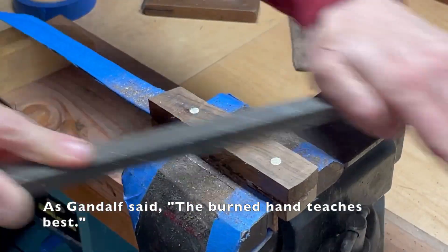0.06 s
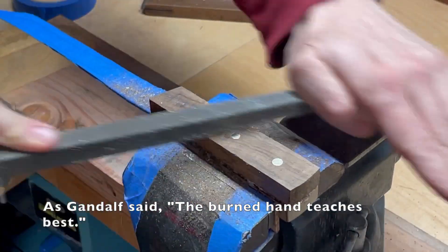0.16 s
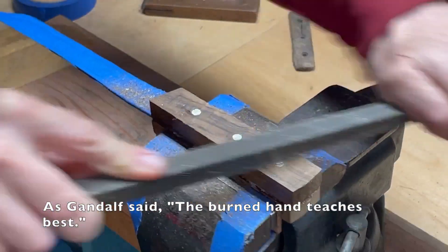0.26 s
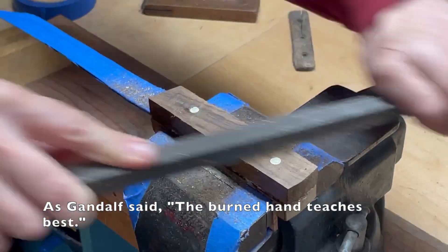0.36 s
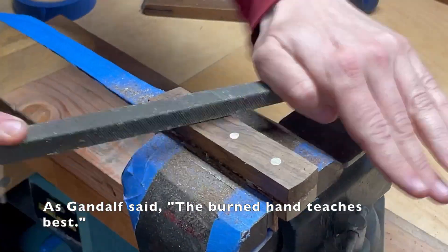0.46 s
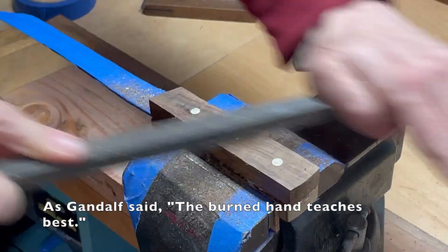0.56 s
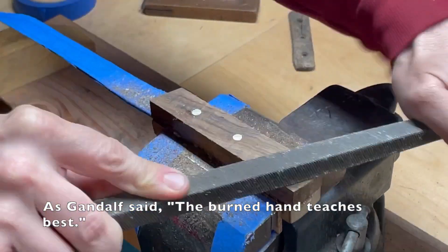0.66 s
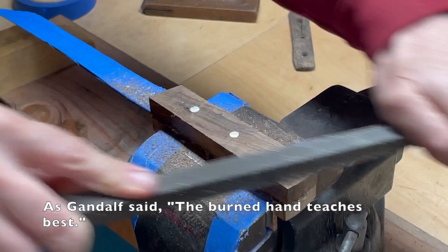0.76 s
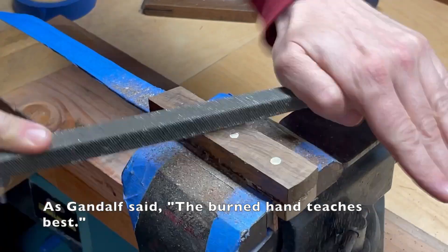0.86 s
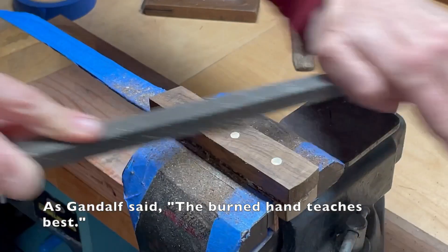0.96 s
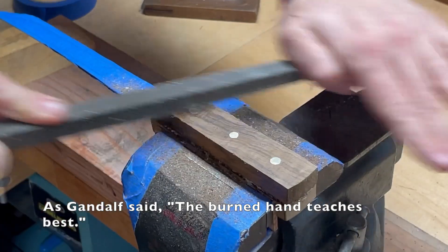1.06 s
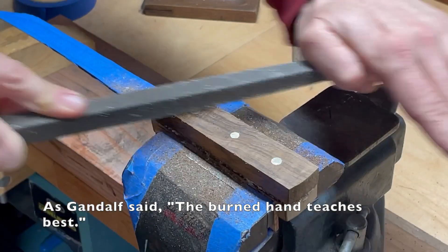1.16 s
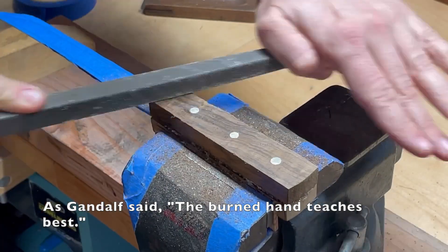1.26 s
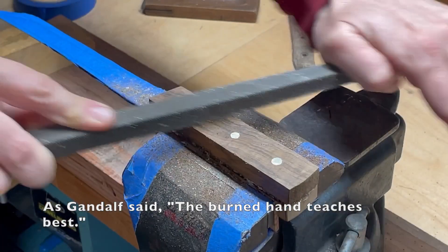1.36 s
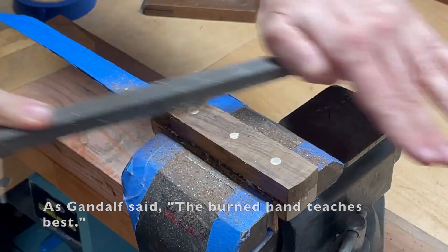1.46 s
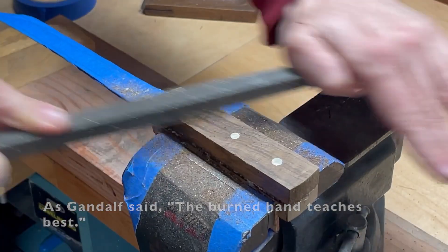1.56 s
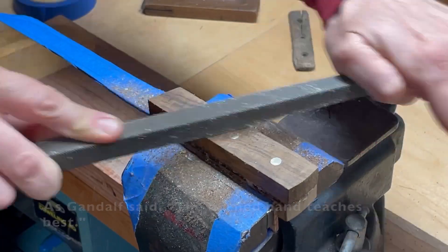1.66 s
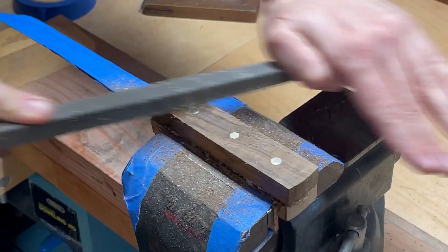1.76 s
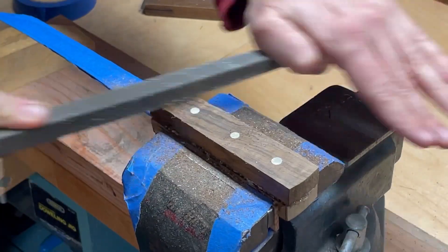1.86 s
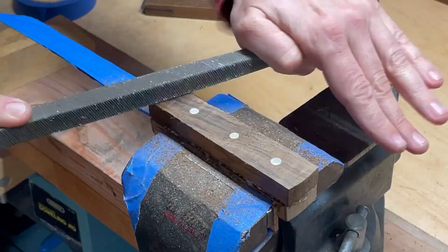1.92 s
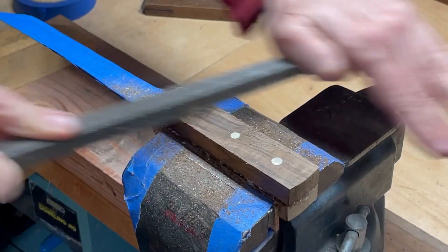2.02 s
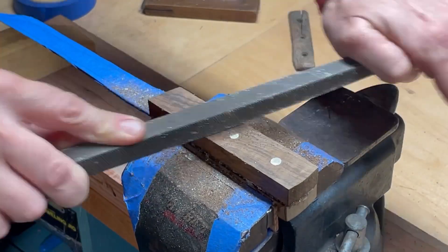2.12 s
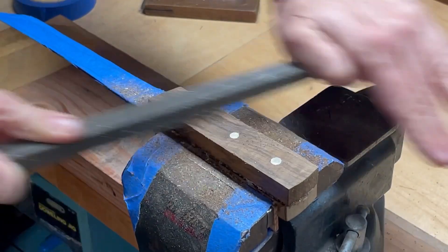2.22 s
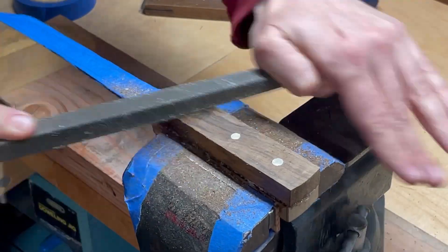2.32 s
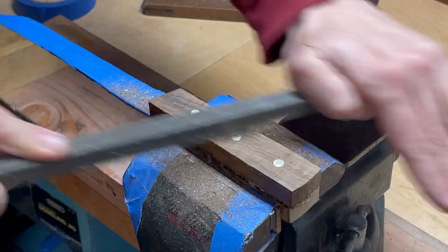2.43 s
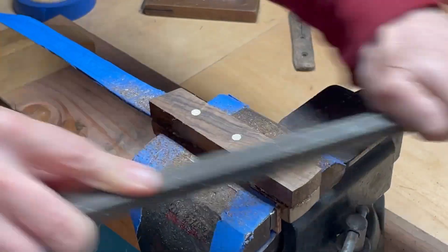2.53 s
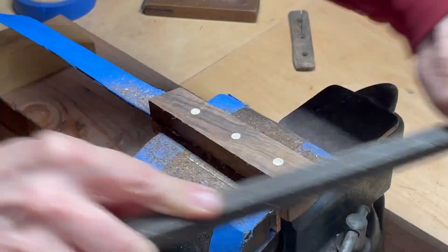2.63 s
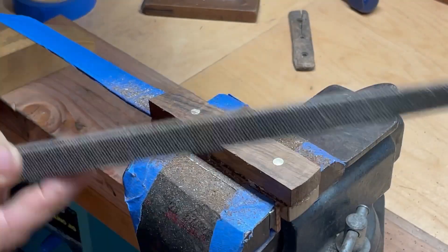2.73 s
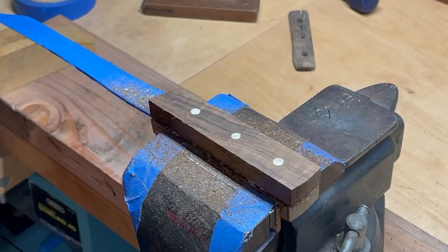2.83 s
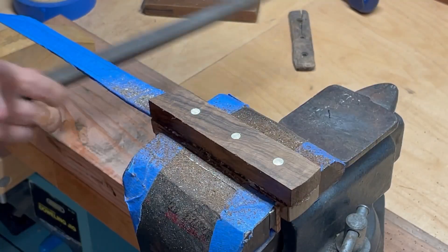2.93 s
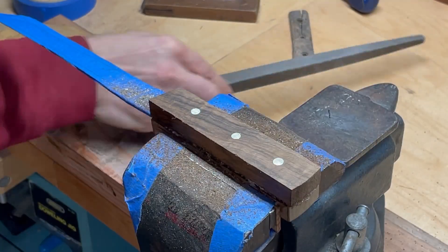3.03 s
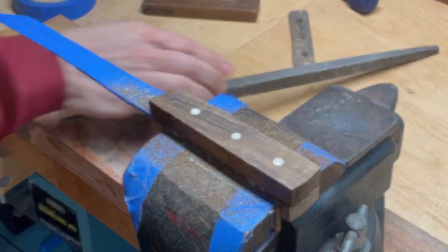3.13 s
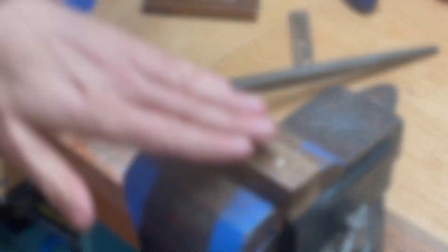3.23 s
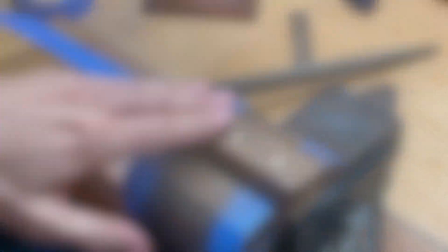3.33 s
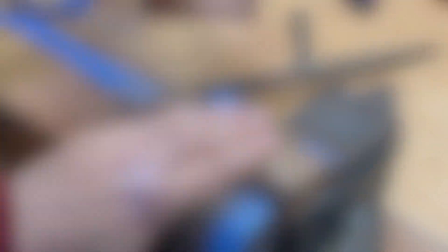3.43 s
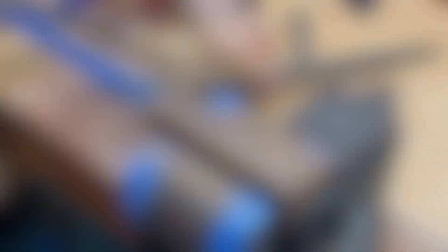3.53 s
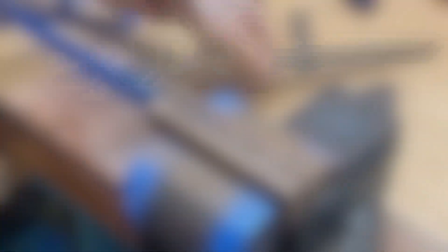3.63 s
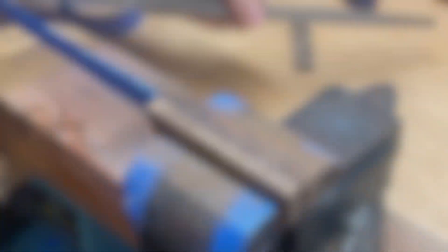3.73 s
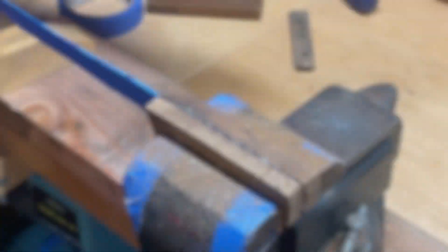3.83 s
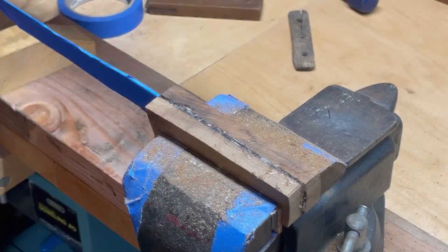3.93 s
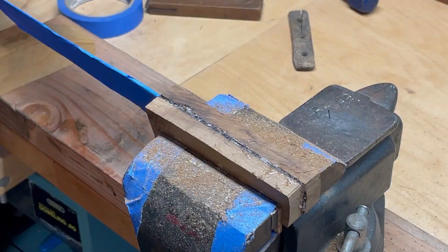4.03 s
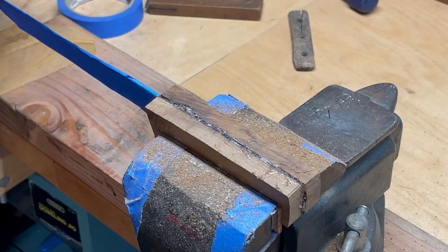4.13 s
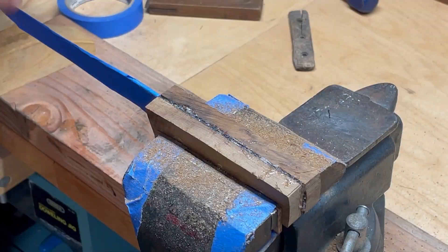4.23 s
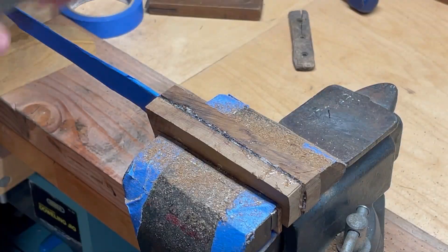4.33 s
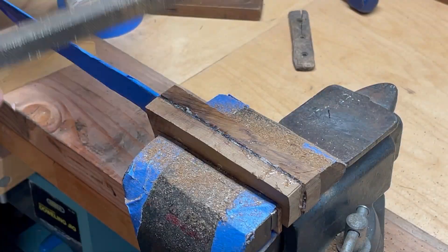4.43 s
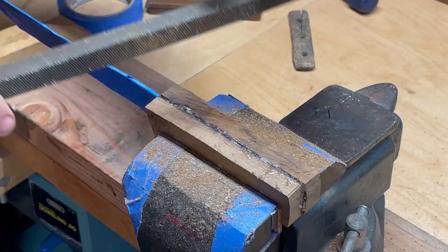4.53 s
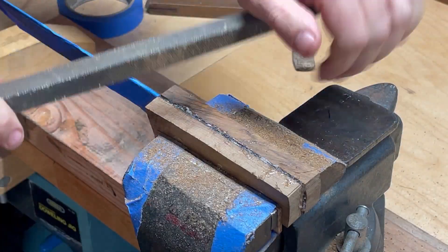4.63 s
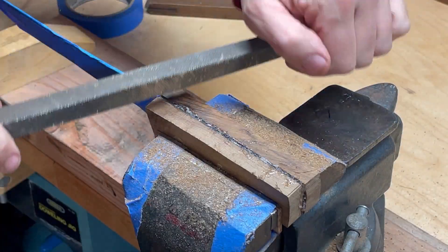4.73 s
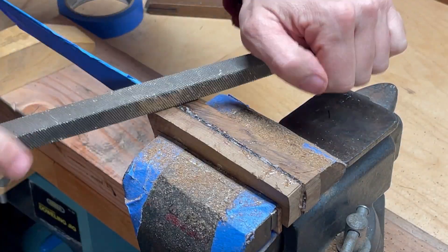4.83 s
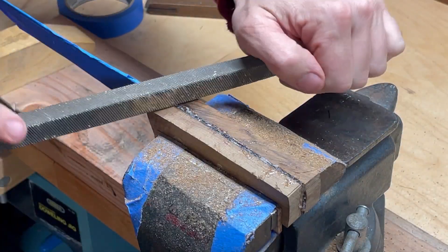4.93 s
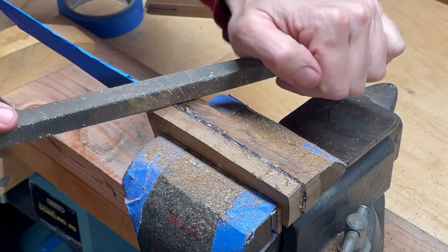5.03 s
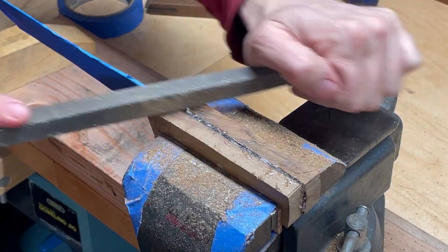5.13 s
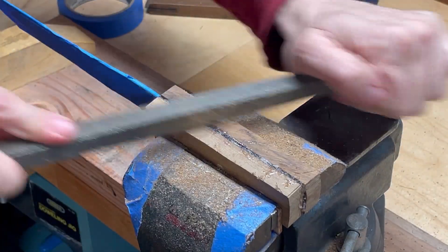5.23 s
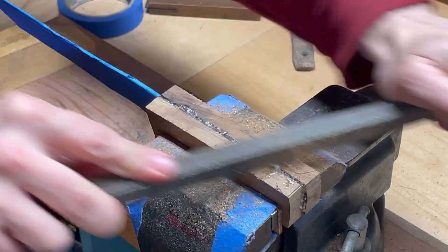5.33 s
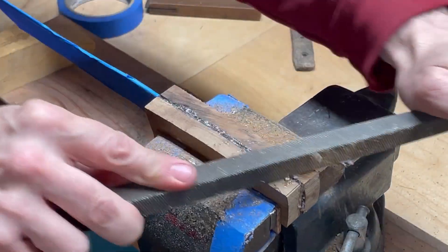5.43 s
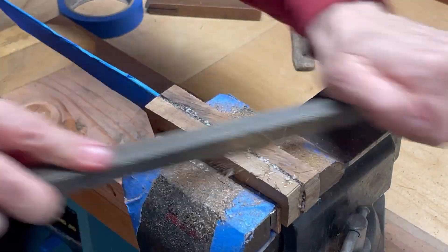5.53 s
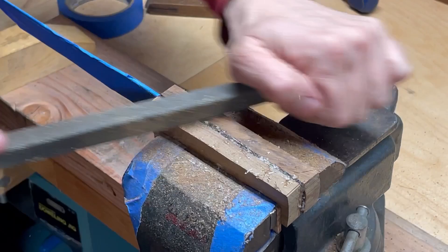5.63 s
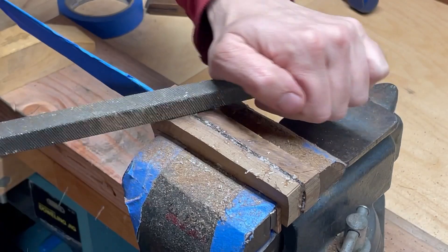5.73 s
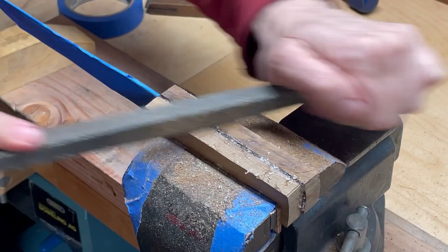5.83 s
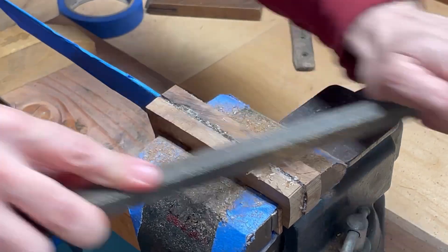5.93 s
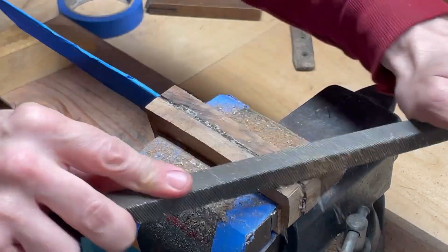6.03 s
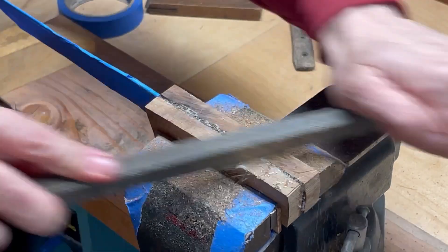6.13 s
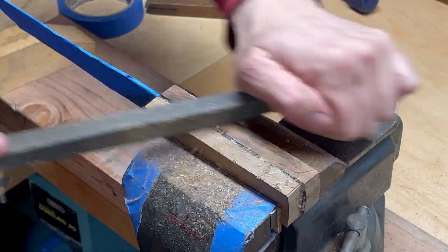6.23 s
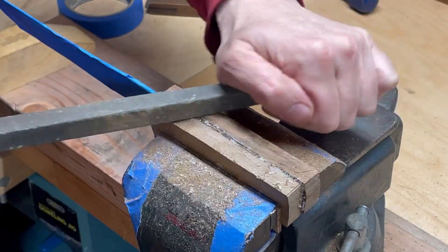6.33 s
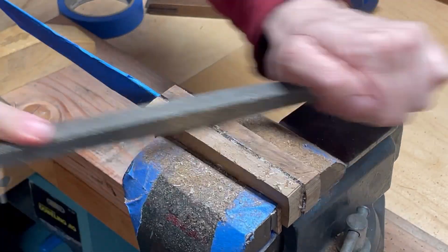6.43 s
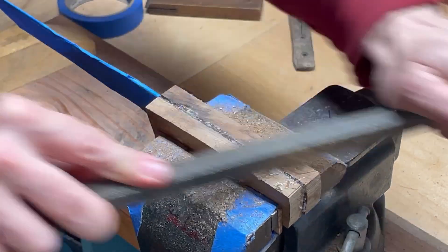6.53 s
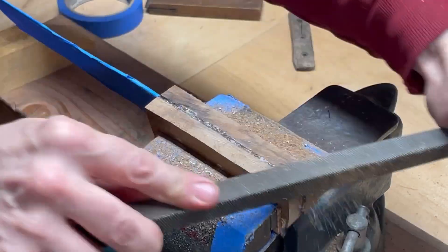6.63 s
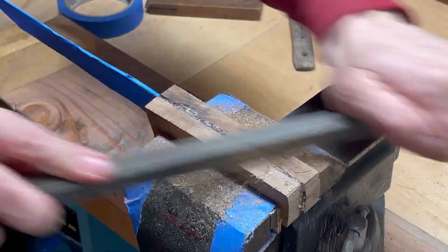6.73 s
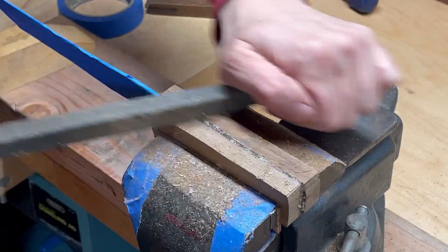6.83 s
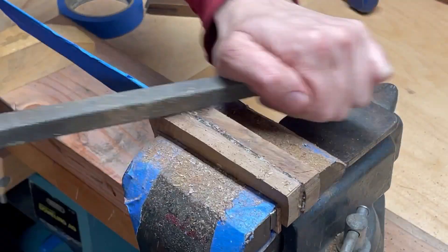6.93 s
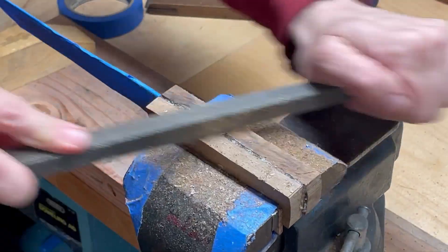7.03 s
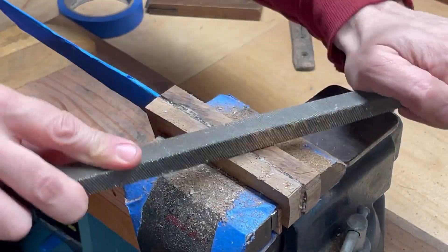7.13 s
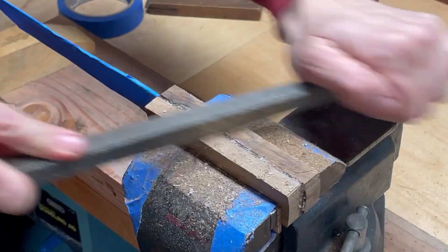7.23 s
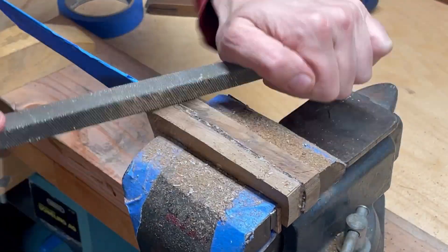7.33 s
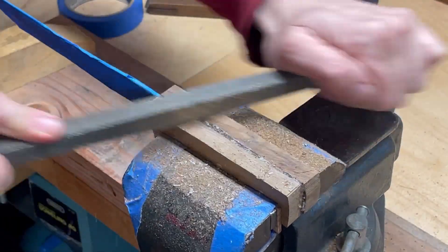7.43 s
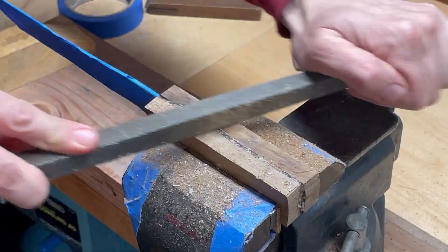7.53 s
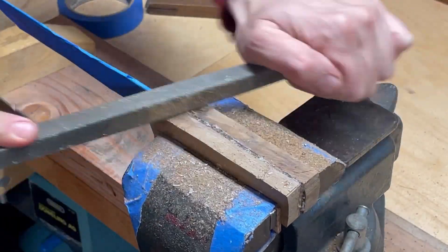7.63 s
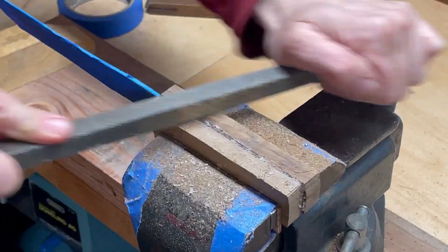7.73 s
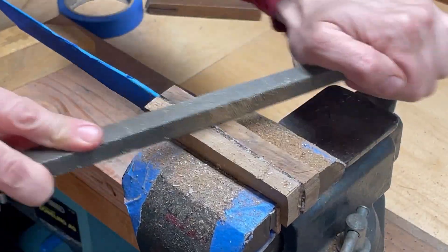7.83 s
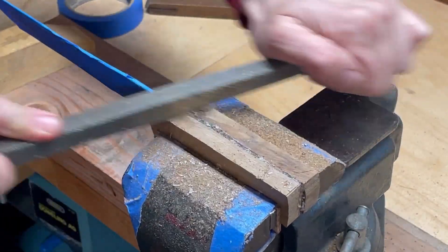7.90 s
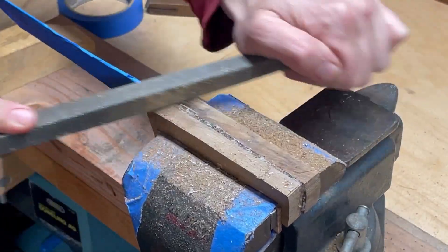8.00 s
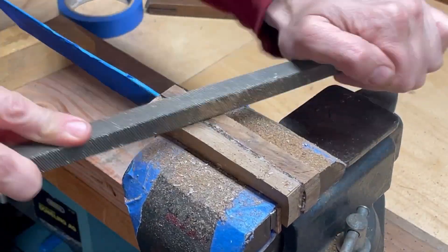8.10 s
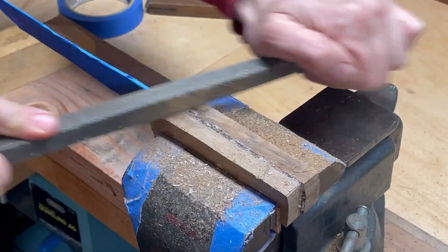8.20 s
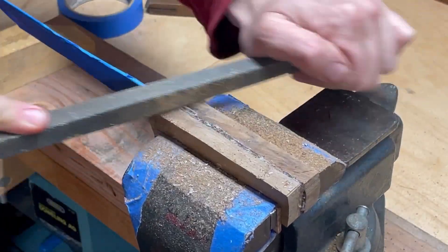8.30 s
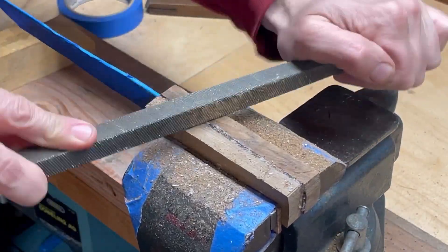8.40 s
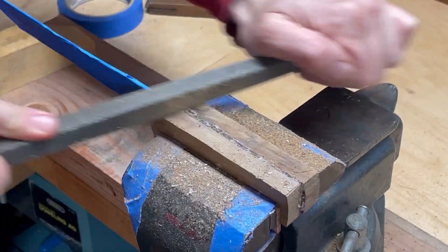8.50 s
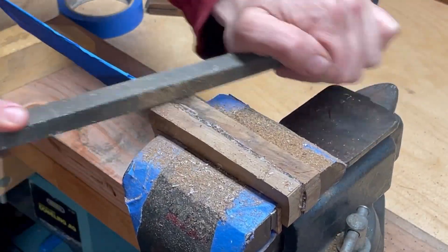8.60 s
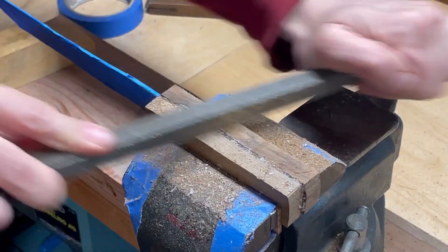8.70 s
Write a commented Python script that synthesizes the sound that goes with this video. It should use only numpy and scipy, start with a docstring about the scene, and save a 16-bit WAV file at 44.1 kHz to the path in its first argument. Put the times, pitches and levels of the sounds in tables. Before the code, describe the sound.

Sped-up file strokes rasp frantically on wood, then a sharp metallic-wooden clack, a soft dusty wipe, and slower coarse filing with vise groans.

```python
"""A flat file rasps wooden handle scales held in a bench vise, heard from close by over faint room tone.
First, quick strokes at four times speed: noise clicks in tooth rhythm, with jolting thuds and short rings.
Then the file drops on the bench in cracks with a wooden ring, and a hand wipes dust in gritty noise.
A sleeve of coloured noise rustles and brushes past, and the teeth scrape faintly as the file settles.
Last, filing at natural pace: biting pushes and lighter pulls, with short sinking tones as the vise groans."""
import sys
import numpy as np
from scipy import signal
from scipy.fft import rfft, irfft, next_fast_len
from scipy.io import wavfile
from scipy.ndimage import uniform_filter1d

SR = 44100
rng = np.random.default_rng(int(sys.argv[2]) if len(sys.argv) > 2 else 0)


def unload_wav(signal):
    """Save mono or channel-first audio to the path in sys.argv[1] as 16-bit WAV at rate SR, clipped to [-1, 1]."""
    wavfile.write(
        sys.argv[1],
        SR,
        np.round(np.clip(np.atleast_2d(signal).T, -1, 1) * 32767).astype(np.int16),
    )


N = 386306
LAPSE = 4  # times natural speed in the sped-up part
NATURAL_FROM_S = 3.5  # divides the sped-up part from the natural pace


def amp(db):
    """Decibels to gain."""
    return 10 ** (np.asarray(db) / 20)


def unit(x):
    """Scales to rms 1."""
    return x / np.sqrt(np.mean(x ** 2) + 1e-20)


def follow(rows, t):
    """The columns of a table at times t, fading fast beyond its ends."""
    s, *columns = np.transpose(rows)
    beyond = np.maximum(np.maximum(s[0] - t, t - s[-1]), 0)
    return [np.interp(t, s, column) - 700 * beyond for column in columns]


def colour(x, points, modes=()):
    """Filters by a smooth spectrum with resonances standing out of it; rms 1."""
    size = next_fast_len(len(x) + SR // 10)
    hz = np.fft.rfftfreq(size, 1 / SR)
    f, db = np.transpose(points)
    lift = 1 + sum(amp(2 * lift_db) / (1 + (2 * (hz - at) / width) ** 2) for at, width, lift_db in modes)
    gain = amp(np.interp(np.log(hz + 1), np.log(f), db)) * np.sqrt(lift)
    return unit(irfft(rfft(x, size) * gain, size)[:len(x)])


def wander(t, per_s):
    """Smooth chance of rms 1."""
    knots = np.arange(t[0], t[-1] + 1, 1 / per_s)
    return unit(np.interp(t, knots, rng.standard_normal(len(knots))))


def swell(t, rise_s, fall_s):
    """A rounded burst that peaks at time zero."""
    return np.exp(-(t / np.where(t < 0, rise_s, fall_s)) ** 2)


def throb(t, hz, rough, per_s=150):
    """An unsteady ring of rms 1."""
    angle = 2 * np.pi * np.cumsum(hz * np.ones(len(t))) / SR
    steady = np.cos(angle) * (1 + rough * wander(t, per_s) / 2)
    return unit(steady + rough * np.sin(angle) * wander(t, per_s))


# Spectrum of the room's rumble and hiss. Each row: frequency in Hz, density in dB per Hz.
ROOM_SPECTRUM = [(15, -44), (35, -9), (72, 0), (210, -19), (4000, -32), (15000, -52)]
ROOM_DB, RAISED_ROOM_DB = -66, -70


def room_tone(t):
    """Faint rumble and hiss of the workshop, raised in pitch until the natural pace sets in."""
    natural = np.clip((t - NATURAL_FROM_S) * 10, 0, 1)
    raised_spectrum = [(LAPSE * hz, db) for hz, db in ROOM_SPECTRUM]
    raised = colour(rng.standard_normal(N), raised_spectrum)
    plain = colour(rng.standard_normal(N), ROOM_SPECTRUM)
    return amp(RAISED_ROOM_DB) * (1 - natural) * raised + amp(ROOM_DB) * natural * plain


def fibres(t, per_s, spread_db):
    """Clicks of snapping wood fibres, a few far larger than the rest."""
    hit = rng.random(len(t)) < per_s / SR
    size_db = spread_db * np.minimum(rng.exponential(1, len(t)), 4)
    return hit * rng.choice([-1, 1], len(t)) * amp(size_db)


def drifting(x, patchy_db):
    """The ring of the work shifts as the point of contact travels: smooth random gains over time and pitch."""
    z = signal.stft(x, nperseg=1024)[2]
    patches = uniform_filter1d(rng.standard_normal(z.shape), size=3, axis=0)
    patches = uniform_filter1d(patches, size=9, axis=1)
    return unit(signal.istft(z * amp(patchy_db * unit(patches)))[1][:len(x)])


# Resonances of scales, tang and file before any speeding up. Each row: frequency in Hz, width in Hz,
# lift with the tip on the work in dB, lift with the heel on it in dB.
RESONANCES = [(564, 130, 4.5, 4.5), (685, 26, 11.5, 17), (1700, 195, 5.5, 4.5), (2392, 30, 3, 12),
              (2810, 350, -2.5, 7), (3430, 140, 7.5, -1)]


def rung(x, spectrum, travel):
    """The ring of file and work changes as the contact travels from the tip (0) to the heel (1)."""
    modes = np.array(RESONANCES)
    tip = colour(x, spectrum, modes[:, [0, 1, 2]])
    heel = colour(x, spectrum, modes[:, [0, 1, 3]])
    return drifting(tip + travel * (heel - tip), patchy_db=4.0)


# Spectra of the cutting hiss, the chattering work and the shuddering bench, before any speeding up.
# Each row: frequency in Hz, density in dB per Hz.
HISS_SPECTRUM = [(600, -15), (1500, -6.5), (2600, -5.5), (3900, -3.5), (4900, -10.5), (7800, -12),
                 (8600, -37), (10500, -16), (15500, -61)]
CHATTER_SPECTRUM = [(280, -4.5), (540, 5.5), (730, -7.5), (880, 3), (1400, -7), (2650, 3), (3400, -47)]
SHUDDER_SPECTRUM = [(22, -71), (53, 10.5), (76, 5.5), (160, 0), (240, -15), (500, -50.5)]


def filing(t, speed, travel, hiss_db, chatter_db, shudder_db, groan_db, edge_db):
    """Rows of teeth strike the wood at a rate set by the speed; the work rings and shakes vise and bench."""
    tooth_hz = (190 + 150 * speed) * (1 + .16 * wander(t, 110))
    turns = np.cumsum(tooth_hz) / SR
    teeth = amp(1.6 * np.cos(2 * np.pi * turns) + 1.76 * wander(t, 200))  # the bite varies with the grain
    cut = rung(teeth * fibres(t, 12000, 2.2), HISS_SPECTRUM, travel)
    cut = unit(cut + amp(edge_db) * np.diff(cut, prepend=0))  # a keen edge is brighter
    chatter = rung(teeth * fibres(t, 2500, 3.9), CHATTER_SPECTRUM, travel)
    shudder = colour(fibres(t, 500, 3.04), SHUDDER_SPECTRUM)
    tooth_note = np.sin(2 * np.pi * turns) * (0.35 + wander(t, 140))
    octave_below = 0.31 * np.sin(np.pi * turns) * wander(t, 160)
    groan = unit(tooth_note + octave_below)
    sound = amp(hiss_db) * cut + amp(chatter_db) * chatter
    sound = sound + amp(shudder_db) * shudder + amp(groan_db) * groan
    no_deep_bass = signal.butter(2, 34, "high", fs=SR, output="sos")  # the filing carries no deep bass
    return signal.sosfilt(no_deep_bass, sound)


# The sped-up strokes, a trip forth and back at a time. Each row: middle of the push in seconds,
# effort of the push in dB, effort of the pull in dB.
TRIPS = [(-.012, -34, -33.5), (.048, -34.5, -36.5), (0.136, -32.5, -34.5), (.205, -38, -35.5),
         (.281, -36.5, -34.5), (.362, -35.5, -36.5), (.445, -37.5, -35.5), (.52, -34, -34.5),
         (.598, -35, -36.5), (0.681, -36.5, -38), (0.754, -37, -41.5), (0.834, -40.5, -38),
         (.92, -40.5, -31), (.986, -37, -33.5), (1.056, -36, -34.5), (1.13, -35, -41), (1.249, -42, -45),
         (1.318, -36.5, -36), (1.383, -38, -36.5), (1.45, -34, -36), (1.522, -36.5, -34),
         (1.596, -36, -36.5), (1.671, -36, -35.5), (1.747, -33, -35), (1.825, -37, -38), (1.909, -35, -36),
         (1.986, -34.5, -33), (2.061, -35.5, -34), (2.138, -36.5, -35.5), (2.225, -35.5, -33.5),
         (2.299, -35.5, -36), (2.38, -36, -37.5), (2.461, -32.5, -42), (2.548, -37.5, -39.5)]
LAST_PUSH_S, LAST_PUSH_DB = 2.639, -40  # one more push
LIFT_OFF_S, LIFT_OFF_DROP_DB = 2.727, 33.5  # then the file leaves the wood
PULL_AT = .48  # share of the trip at which the pull is fastest
# hiss, chatter and shudder beside the effort, in dB
QUICK_PUSH, QUICK_PULL = (2.44, -3.5, -3.06), (2.5, -2.5, -6)


def quick_filing():
    """Short even strokes that start abruptly and stop at each turn; sped up, they sound two octaves higher."""
    t = np.arange(round((LAST_PUSH_S + .5) * LAPSE * SR)) / SR
    heard_s, trips = t / LAPSE, np.array(TRIPS)
    pushes = trips[:, 0]
    pulls = pushes + PULL_AT * np.diff(np.r_[pushes, LAST_PUSH_S])
    middles = np.r_[np.c_[pushes, pulls].ravel(), LAST_PUSH_S, LIFT_OFF_S]
    efforts = np.r_[trips[:, 1:].ravel(), LAST_PUSH_DB, LAST_PUSH_DB - LIFT_OFF_DROP_DB]
    angle = np.pi * np.interp(heard_s, middles, np.arange(len(middles)))
    slack = np.sin(angle - .3 * np.sin(angle) ** 2) ** 2  # 0 at full speed, 1 at a turn
    pull = np.sin(angle / 2) ** 2  # 0 in a push, 1 in a pull
    effort_db = follow(np.c_[middles, efforts], heard_s)[0]
    hiss_db, chatter_db, shudder_db = (effort_db + a + pull * (b - a) for a, b in zip(QUICK_PUSH, QUICK_PULL))
    # the heavy bench evens out the strokes
    shudder_db = shudder_db - .5 * (effort_db - np.median(efforts)) * (heard_s < LAST_PUSH_S)
    groan_db = (chatter_db + shudder_db) / 2 - 6.5 - 8 * slack
    sound = filing(t, 1 - slack, (1 + np.sin(angle)) / 2,
                   hiss_db - 11.4 * slack ** 0.58, chatter_db - 13 * slack, shudder_db - 3.3 * slack,
                   groan_db, edge_db=-32)
    return np.pad(signal.resample_poly(sound, 1, LAPSE), (0, N))[:N]


# at natural pace; the sped-up part plays it four times as fast and high
CATCH_HZ, CATCH_RISE_S, CATCH_FALL_S = 681.4, 0.024, 0.021
CATCH_UPPER_HZ, CATCH_UPPER_DB = 1596, -12  # a second, weaker ring


def catch(t):
    """The teeth fall into step with the scales, which ring up and die away."""
    ring = throb(t, CATCH_HZ, rough=1.1) + amp(CATCH_UPPER_DB) * throb(t, CATCH_UPPER_HZ, rough=2.5)
    return swell(t, CATCH_RISE_S, CATCH_FALL_S) * ring


# at natural pace, likewise
BUMP_HZ, BUMP_RISE_S, BUMP_FALL_S, BUMP_SAG_OCTAVES_PER_S = 128, 0.025, 0.043, 9


def bump(t):
    """The file jolts against the work and the whole bench gives a rough thud that sinks in pitch."""
    hz = BUMP_HZ * 2 ** (-BUMP_SAG_OCTAVES_PER_S * t)
    note = throb(t, hz, rough=1.4) + amp(-11.5) * throb(t, 2.7 * hz, rough=4.1)
    thud = swell(t, BUMP_RISE_S, BUMP_FALL_S) * note
    return signal.sosfilt(signal.butter(4, 58, "high", fs=SR, output="sos"), thud)


# Dull bumps of the file against the work, mostly as a push ends. Each row: peak in seconds, level in dB.
BUMP_TIMES = [(.048, -37.5), (0.145, -32), (.297, -33.5), (.375, -34.5), (.451, -33.5), (1.522, -34),
              (1.745, -38), (4.879, -47.5), (4.969, -44.5), (5.211, -33), (5.38, -26.5), (6.004, -37),
              (6.459, -38)]
# The teeth catch and the scales ring out briefly. Each row: peak in seconds, level in dB.
CATCH_TIMES = [(0.022, -34.5), (0.095, -37.5), (.278, -35), (.56, -35.5), (.603, -35.5), (.753, -36.5),
               (2.546, -35), (2.637, -30.5), (5.32, -34.5), (6.55, -38.5), (7.05, -38.5)]


def jolts(lapse):
    """The bumps and catches of the sped-up part, or of the part at natural pace."""
    t = np.arange(-SR // 5, SR // 5) / SR
    out = np.zeros(N + 2 * SR)  # a spare second at either end
    for source, rows in ((bump, BUMP_TIMES), (catch, CATCH_TIMES)):
        for s, db in rows:
            if (s < NATURAL_FROM_S) == (lapse > 1):
                sound = signal.resample_poly(source(t), 1, lapse)
                first = SR + round(s * SR) - len(sound) // 2
                out[first:][:len(sound)] += amp(db) * sound
    return out[SR:SR + N]


# The hand letting go of the file, then wiping off dust. Each row: time in seconds, level in dB.
WIPE_LEVELS = [(3.0, -62.5), (3.04, -80), (3.2, -78), (3.26, -65), (3.55, -59), (3.6, -57.5), (3.79, -56.5)]
# Fingers brushing the scales. Each row: peak in seconds, level in dB.
BRUSH_TIMES = [(3.221, -59.5), (3.351, -59), (3.503, -62)]
BRUSH_RISE_S, BRUSH_FALL_S = 0.0022, 0.0083
# Spectra of gritty dust and of soft cloth or skin. Each row: frequency in Hz, density in dB per Hz.
DUST_SPECTRUM = [(300, -2.5), (1800, -9), (15000, -10)]
CLOTH_SPECTRUM = [(500, -18.5), (1800, -1.5), (4700, -3), (6800, -12), (15000, -28)]


def wiping(t):
    """Skin drags gritty dust along the wood; the fingers land with short brushes, soft as cloth."""
    touches = sum(amp(db) * swell(t - s, BRUSH_RISE_S, BRUSH_FALL_S) for s, db in BRUSH_TIMES)
    grit = fibres(t, 14000, 3.6)
    drag = amp(follow(WIPE_LEVELS, t)[0] + 2.0 * wander(t, 45))
    return drag * colour(grit, DUST_SPECTRUM) + touches * colour(grit, CLOTH_SPECTRUM)


# Knocks of the file on the bench and flicks of the fingers. Each row: start in seconds, level in dB,
# high-pass corner in Hz.
BLOWS = [(3.079, -36, 390), (3.091, -43, 300), (3.261, -72, 3280), (3.581, -60, 3320)]
# Spectrum of the crack. Each row: frequency in Hz, density in dB per Hz.
CRACK_SPECTRUM = [(800, -1), (2400, -12), (3800, -19), (6000, -19), (15000, -27)]
# What the file and the bench top ring with. Each row: frequency in Hz, level in dB,
# time to fall by 60 dB in seconds.
RING_MODES = [(540, 0.5, 0.11), (943, 1, 0.074), (1413, -1, 0.063), (2010, 1, 0.03), (3680, -0.5, 0.022)]
RING_DB = -4  # beside the crack


def knocks():
    """Each blow is a crack whose treble dies first, and a short wooden ring."""
    out, t = np.zeros(N), np.arange(8192) / SR
    for s, db, low_hz in BLOWS:
        dull_noise = signal.lfilter(*signal.butter(1, 1800, fs=SR), rng.standard_normal(len(t)))
        body = dull_noise * amp(-60 * t / 0.084)
        snap = rng.standard_normal(len(t)) * 1.9 * amp(-60 * t / 0.032)
        ring = sum(amp(mode_db - 60 * t / t60) * np.sin(2 * np.pi * (hz * t + rng.random()))
                   for hz, mode_db, t60 in RING_MODES)
        blow = colour(body + snap, CRACK_SPECTRUM) + amp(RING_DB) * unit(ring)
        blow = signal.lfilter(*signal.butter(3, low_hz, "high", fs=SR), blow)
        out[round(s * SR):][:len(t)] += amp(db) * unit(blow)
    return out


# Rustle of hand and sleeve, sweeping off the work and bringing the file back.
# Each row: time in seconds, level in dB.
RUSTLE_LEVELS = [(3.6, -62.5), (3.77, -53), (3.83, -66.5), (3.99, -65), (4.3, -66), (4.4, -69)]
SWISH_S, SWISH_HALF_LENGTH_S, SWISH_DB = 4.52, .065, -56.5


def sleeve(t):
    """Cloth rustles, then brushes past as the file is brought back to the work."""
    rustle_gain = amp(follow(RUSTLE_LEVELS, t)[0] + wander(t, 51))
    rustle = rustle_gain * colour(rng.standard_normal(N), CLOTH_SPECTRUM)
    swish_gain = amp(SWISH_DB) * swell(t - SWISH_S, SWISH_HALF_LENGTH_S, SWISH_HALF_LENGTH_S)
    return rustle + swish_gain * colour(rng.standard_normal(N), CLOTH_SPECTRUM)


SETTLE_S, SETTLE_HALF_LENGTH_S, SETTLE_DB = 4.96, .14, -61.5


def settling(t):
    """The teeth scrape faintly while the file finds its place on the wood."""
    scrape = rung(fibres(t, 2500, 3.9), HISS_SPECTRUM, travel=0)
    return amp(SETTLE_DB) * swell(t - SETTLE_S, SETTLE_HALF_LENGTH_S, SETTLE_HALF_LENGTH_S) * scrape


# The strokes at natural pace, push and pull in turn. Each row: start in seconds, effort in dB,
# hiss left at the turn before it in dB.
SLOW_STROKES = [(5.097, -35, -55), (5.421, -44.5, -51), (5.714, -35, -68), (6.029, -45.5, -56),
                (6.298, -34.5, -65.5), (6.652, -42, -47), (6.887, -33, -58.5), (7.148, -42, -62.5),
                (7.345, -37, -54), (7.516, -42.5, -60), (7.66, -38, -53.5), (7.818, -42.5, -61),
                (7.97, -39, -55.5), (8.134, -43.5, -66), (8.254, -38.5, -62.5), (8.418, -44, -61.5),
                (8.576, -34, -54.5)]
LAST_TURN_S = 8.79
PUSH_SKEW, PULL_SKEW = 0.99, .85  # over 1: the stroke is fastest late
# a long stroke has time to chatter more: dB beside the hiss, for a stroke of this length
CHATTER_DB, CHATTER_LENGTH_S, CHATTER_DB_PER_DOUBLING = -12, 0.24, 5.5
SHUDDER_DB = -3  # beside the effort: the bench shakes in step with it
PULL_GROWL_DB, PUSH_GROWL_DB = -1.5, -10.5  # the teeth's own low note, beside the effort


def slow_filing(t):
    """Each stroke speeds up and slows again; at some turns the file halts, at others it keeps rubbing."""
    starts, efforts, rests = np.transpose(SLOW_STROKES)
    turns = np.r_[starts, LAST_TURN_S]
    place = np.interp(t, turns, np.arange(len(turns)))
    stroke = np.minimum(place.astype(int), len(starts) - 1)
    progress, pull, effort_db = place - stroke, stroke % 2, efforts[stroke]
    speed = np.sin(np.pi * progress ** np.where(pull, PULL_SKEW, PUSH_SKEW))
    late = np.sin(np.pi * progress ** 3.05)  # wood and vise take time to build up their shaking
    slack = (1 - speed) ** 1.254
    rest_db = np.interp(stroke + np.sin(np.pi * progress / 2) ** 2, np.arange(len(rests)), rests)
    hiss_db = effort_db + slack * (rest_db - effort_db)
    doublings = np.log2(np.diff(turns) / CHATTER_LENGTH_S)[stroke]
    chatter_db = hiss_db + CHATTER_DB + CHATTER_DB_PER_DOUBLING * doublings
    chatter_db = chatter_db + 10 * (late - .5) + 8 * slack
    shudder_db = effort_db + SHUDDER_DB - 6 * (1 - speed)
    growl_db = effort_db + np.where(pull, PULL_GROWL_DB, PUSH_GROWL_DB) - 8 * (1 - late)
    travel = np.sin(np.pi * place / 2) ** 2
    sound = filing(t, speed, travel, hiss_db, chatter_db, shudder_db, growl_db, edge_db=-46.5)
    return sound * np.clip((t - starts[0]) * 20, 0, 1)


# The vise groans as the teeth pass through its pitch, mostly falling while a pull slows.
# Each row: peak in seconds, level in dB, pitch at the peak in Hz, half length in seconds.
GROAN_NOTES = [(5.229, -42.5, 300, .05), (5.62, -40.5, 200, 0.063), (5.95, -44, 355, .05),
               (6.569, -42.5, 380, .04), (6.836, -43, 391, .028), (6.875, -40.5, 227.4, 0.027),
               (7.296, -42, 370, .045), (7.602, -39.5, 330, .038), (7.9, -39.5, 370.3, 0.043),
               (8.04, -39.5, 194, 0.06), (8.204, -42.5, 330, .05), (8.541, -34, 289.7, .025),
               (8.649, -39.5, 278.8, .045)]
GROAN_SAG_OCTAVES, GROAN_ROUGH = 0.1092, 1.0  # fall in pitch over one half length; unsteadiness
GROAN_LOW_RATIO, GROAN_LOW_DB = .68, -6.5  # a weaker ring below


def groans(t):
    """The vise swells into a short rough note that sinks with the speed of the file."""
    out = np.zeros(N)
    for s, db, hz, half_length_s in GROAN_NOTES:
        near = abs(t - s) < np.pi * half_length_s
        since = t[near] - s
        pitch = hz * 2 ** (-GROAN_SAG_OCTAVES * since / half_length_s)
        low_ring = throb(since, GROAN_LOW_RATIO * pitch, GROAN_ROUGH)
        note = throb(since, pitch, GROAN_ROUGH) + amp(GROAN_LOW_DB) * low_ring
        out[near] += amp(db) * swell(since, half_length_s, half_length_s) * note
    return out


def workshop(x, wet_db, t60):
    """Early reflections off bench and walls, sparse random echoes that differ at each ear."""
    t = np.arange(SR // 3) / SR
    hit = rng.standard_normal((2, len(t))) * (rng.random((2, len(t))) < 2500 / SR)
    taps = hit * amp(-60 * t / t60) * (t > .002)
    taps /= np.linalg.norm(taps, axis=1, keepdims=True)
    taps = signal.lfilter(*signal.butter(1, 350, "high", fs=SR), taps)
    wet = signal.oaconvolve(x[None], taps, axes=1)[:, :N]
    return (x + amp(wet_db) * wet) / np.hypot(1, amp(wet_db))


# How widely the reflections spread between the ears. Each row: frequency in Hz, side gain in dB.
SPREAD_BANDS = [(60, 2), (140, -6.5), (300, 0), (650, 0), (1500, 6), (2700, -4.5), (4200, -32.5), (6400, 6),
                (10000, 4)]
# How the sound leans. Each row: frequency in Hz, left minus right in dB.
LEAN_BANDS = [(60, -4), (290, -1.5), (1200, -4.5), (3100, 0)]


def ears(pair, lapse):
    """Each band has its own width and lean to the right; sped up, the pattern rises with the pitch."""
    left, right = rfft(pair)
    log_hz = np.log(np.fft.rfftfreq(N, 1 / SR) / lapse + 1)
    bands = (np.transpose(SPREAD_BANDS), np.transpose(LEAN_BANDS))
    spread, lean = (amp(np.interp(log_hz, np.log(f), db)) for f, db in bands)
    mid = (left + right) / 2
    side = spread * (left - right) / 2 + mid * (lean - 1) / (lean + 1)
    return irfft(np.array([mid + side, mid - side]), N)


def scene():
    """Sped-up filing, the drop and the wiping, then filing at natural pace, with room tone throughout."""
    t = np.arange(N) / SR
    quick_dry = quick_filing() + jolts(LAPSE) + knocks() + wiping(t)
    slow_dry = room_tone(t) + sleeve(t) + settling(t) + slow_filing(t) + jolts(1) + groans(t)
    quick = workshop(quick_dry, wet_db=-4, t60=0.091)
    slow = workshop(slow_dry, wet_db=-2.0, t60=0.15)
    return ears(quick, LAPSE) + ears(slow, 1)


EDGE_HZ = 15900


def record(dry):
    """A steep low-pass takes off the highest treble."""
    low_pass = signal.firwin(511, EDGE_HZ, window=("kaiser", 9), fs=SR)
    return signal.oaconvolve(dry, low_pass[None], "same")


dry = scene()
out = record(dry)
unload_wav(out)
```